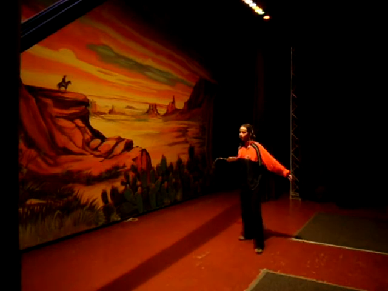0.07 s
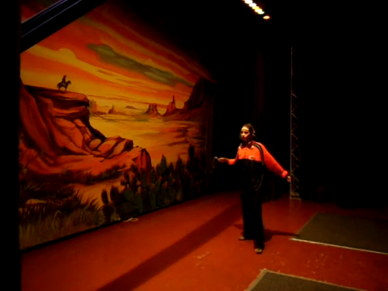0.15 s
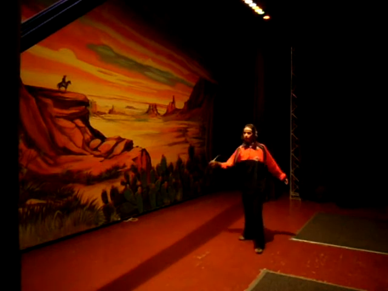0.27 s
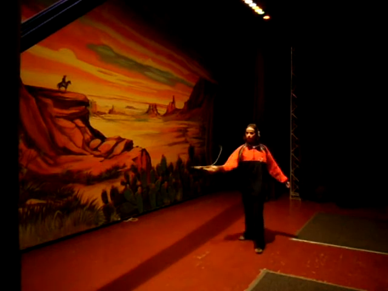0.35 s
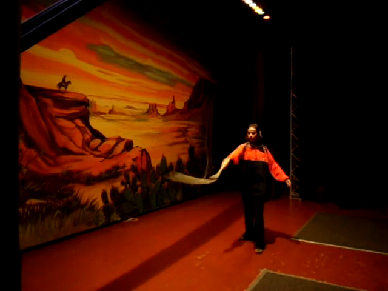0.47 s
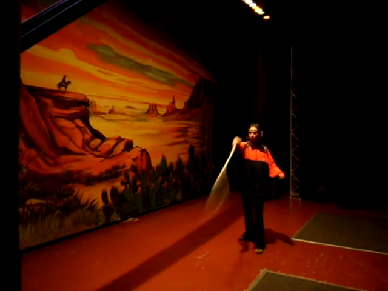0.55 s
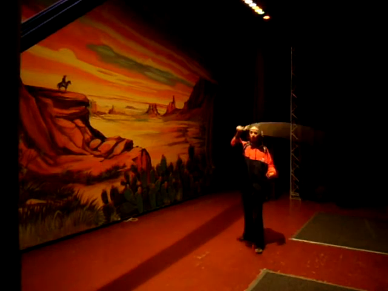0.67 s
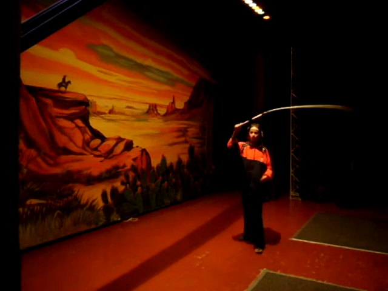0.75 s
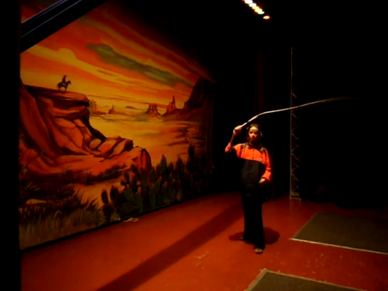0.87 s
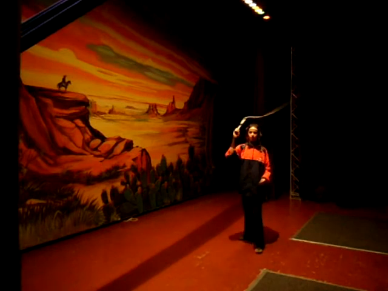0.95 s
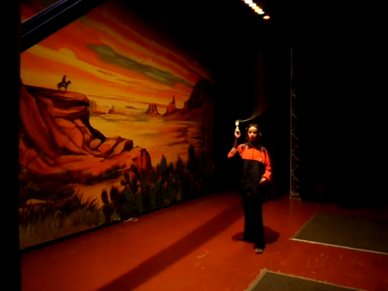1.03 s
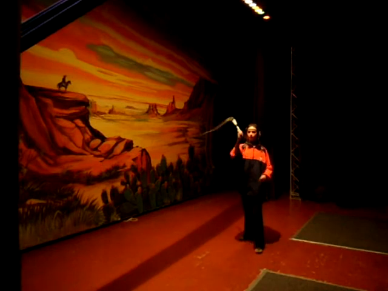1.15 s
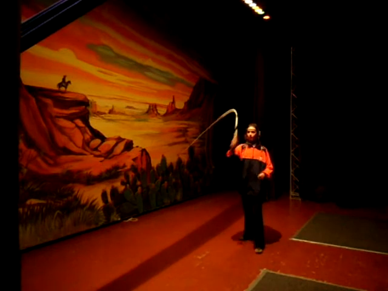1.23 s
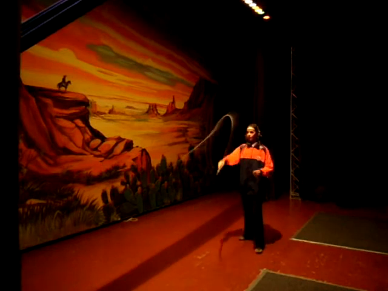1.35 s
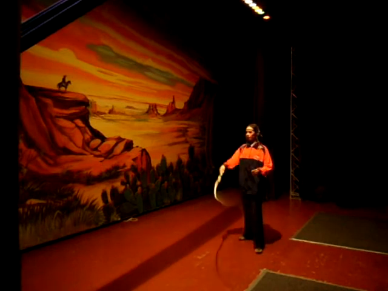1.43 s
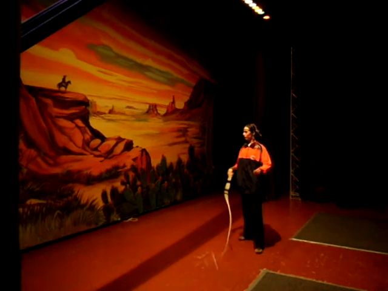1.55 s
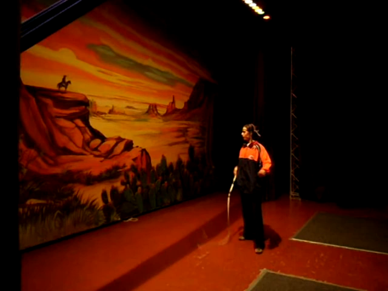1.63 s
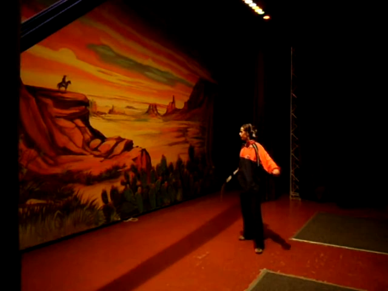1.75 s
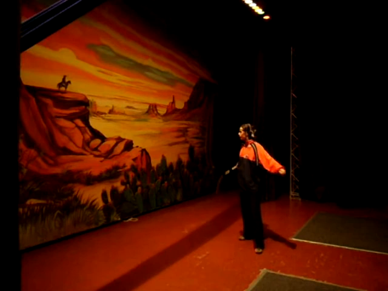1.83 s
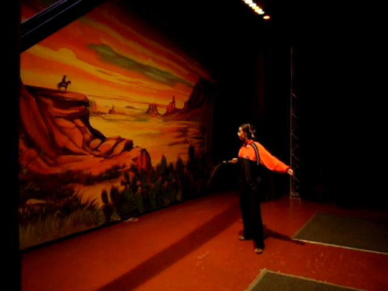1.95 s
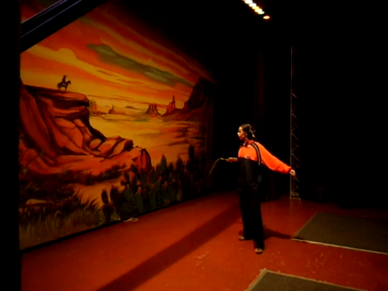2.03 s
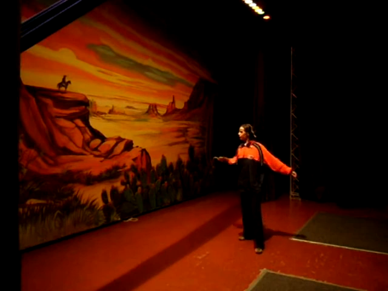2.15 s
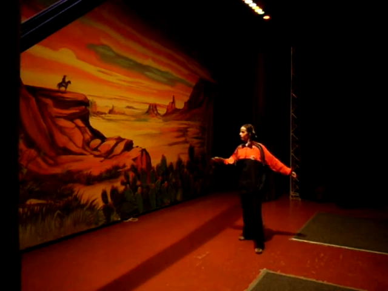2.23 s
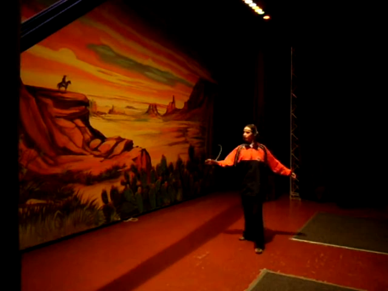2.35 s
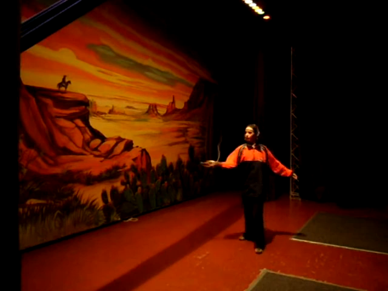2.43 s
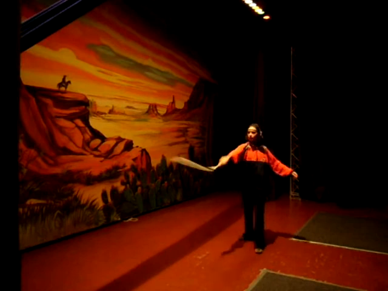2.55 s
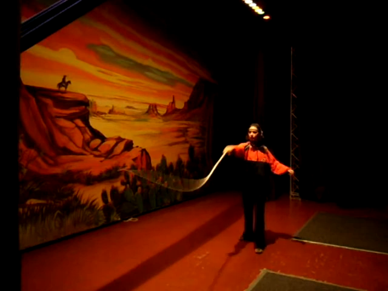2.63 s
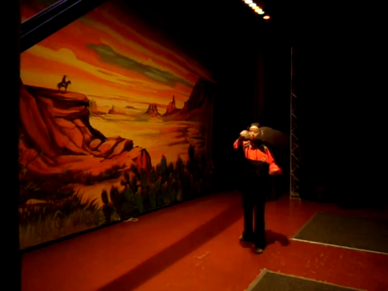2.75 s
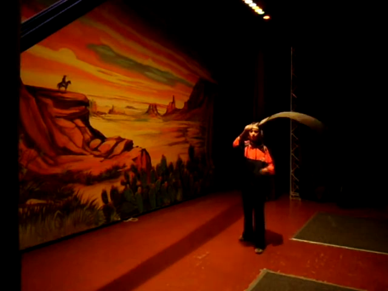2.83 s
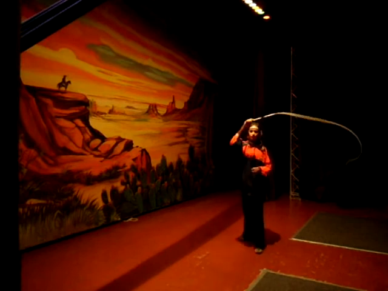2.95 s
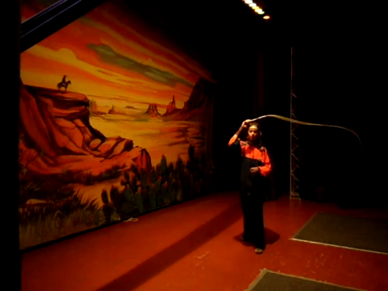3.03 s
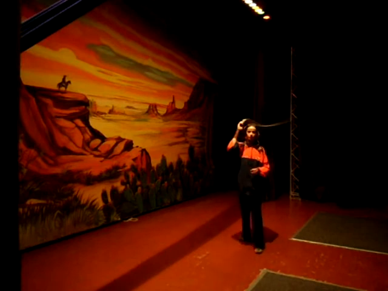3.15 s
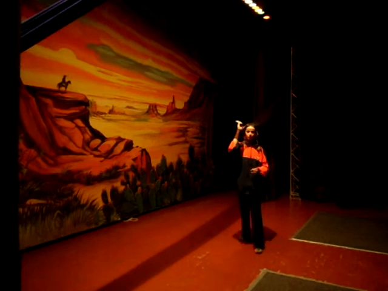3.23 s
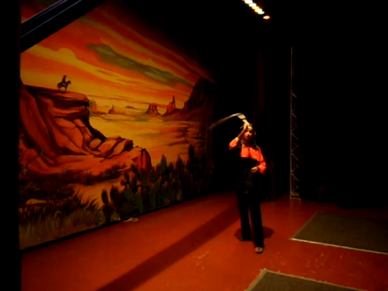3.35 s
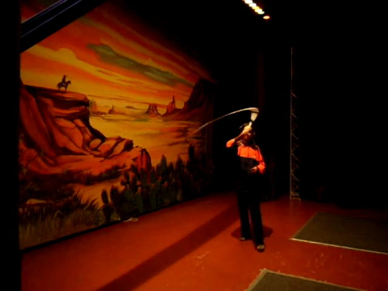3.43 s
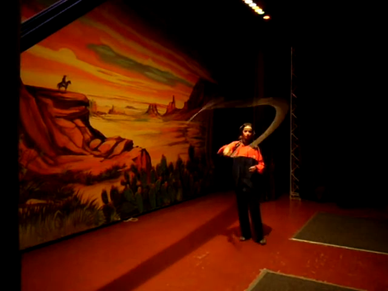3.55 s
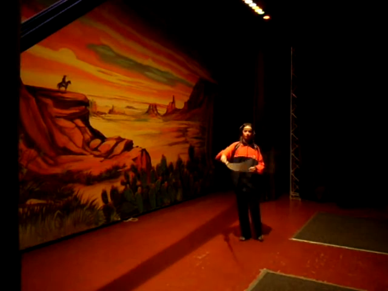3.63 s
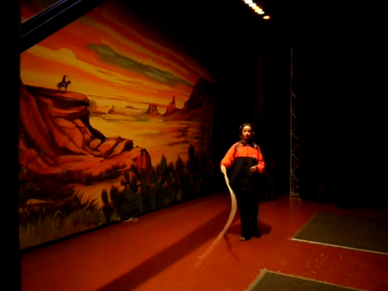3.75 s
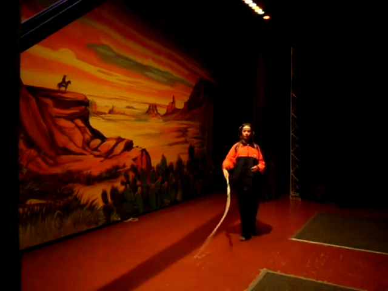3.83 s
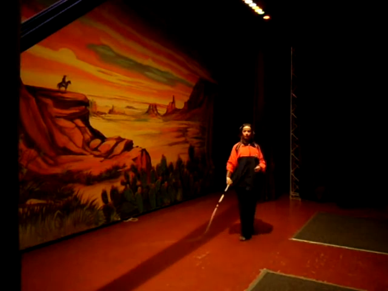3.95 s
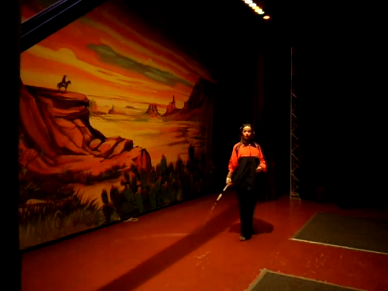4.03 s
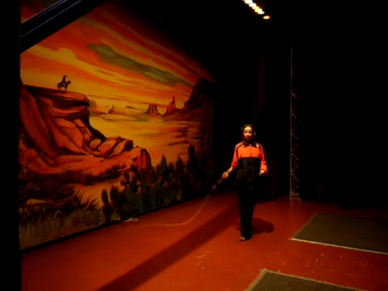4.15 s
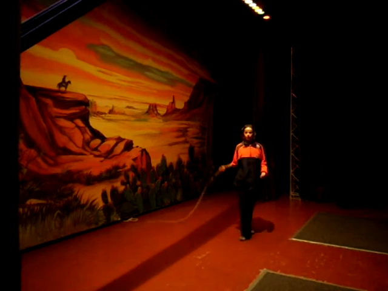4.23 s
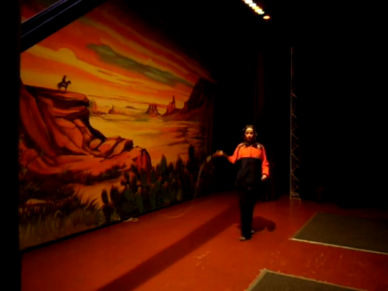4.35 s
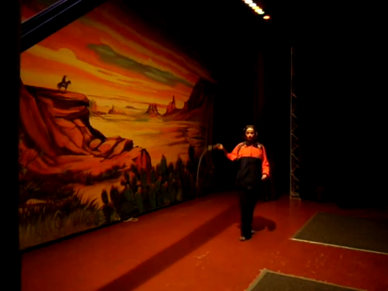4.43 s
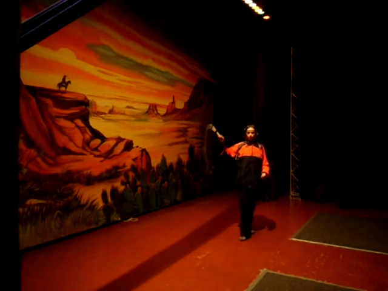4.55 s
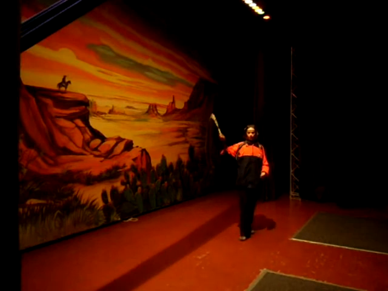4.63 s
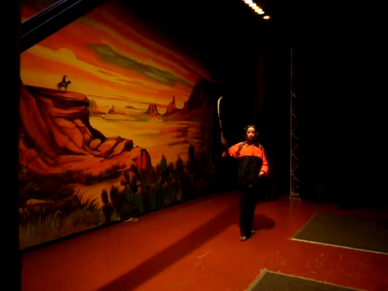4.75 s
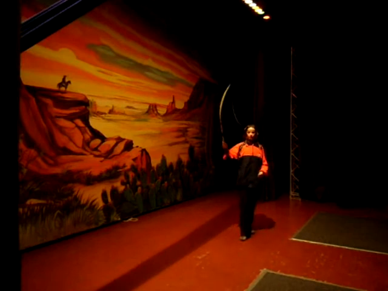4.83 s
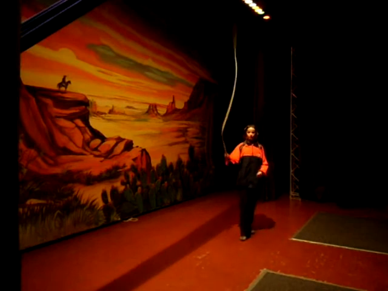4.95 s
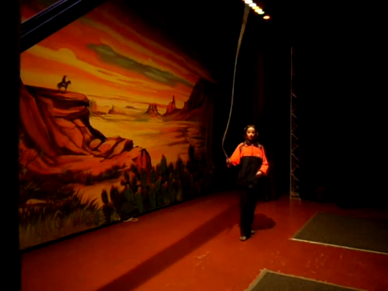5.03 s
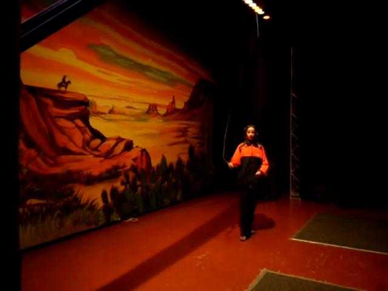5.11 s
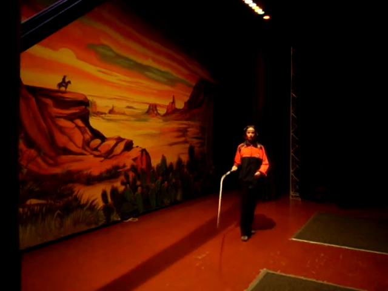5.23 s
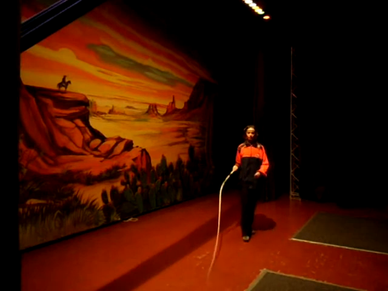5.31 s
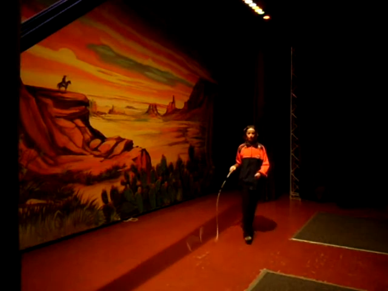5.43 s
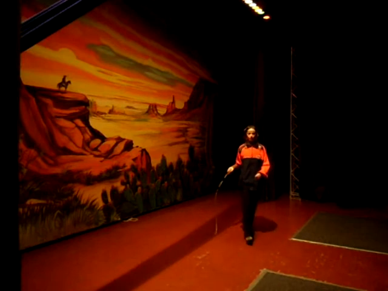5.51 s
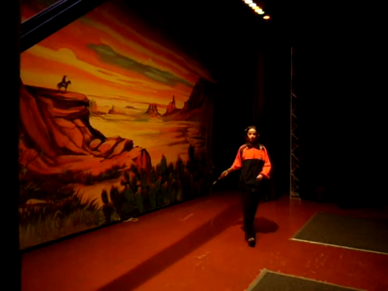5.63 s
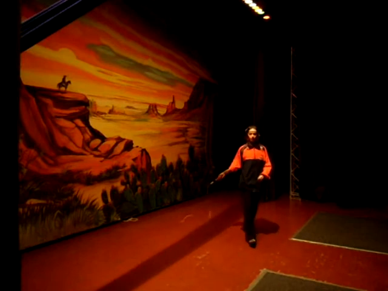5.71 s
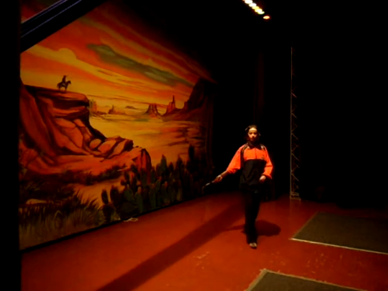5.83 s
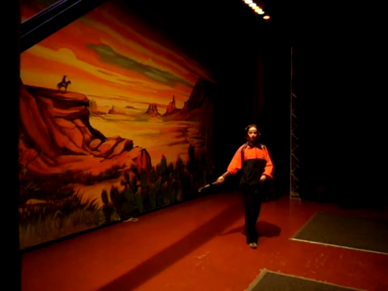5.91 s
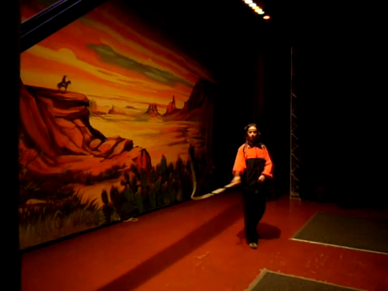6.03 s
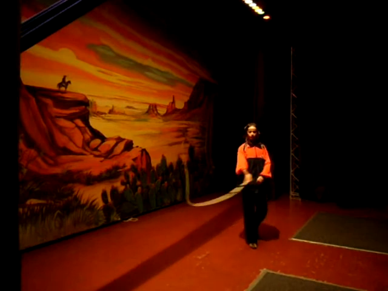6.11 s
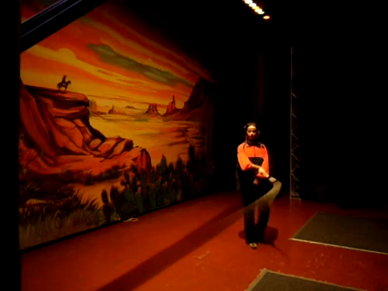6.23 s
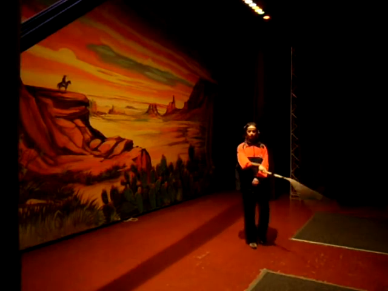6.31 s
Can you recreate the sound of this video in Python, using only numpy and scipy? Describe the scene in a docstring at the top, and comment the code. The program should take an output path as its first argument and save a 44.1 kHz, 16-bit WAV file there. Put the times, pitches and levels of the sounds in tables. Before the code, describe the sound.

Someone swings a whip in a large bare room, heard from a few metres through a small, band-limited microphone. Faint airy swishes lead into sharp, gunshot-like cracks with quick wall echoes and a short hall tail. The first three are violent and clipped, the fourth weaker, and the last two merge into one small snap. Low hiss and faint rumble continue below; soft swishes end it.

```python
"""A soft swish comes first, over a quiet hiss; then a whip cracks six times, the last two almost as one.
The whip is swung on a bare indoor stage, some metres from a small camera. Swishes are shaped noise
with fuzzy whistles; each crack is a rush of noise, a pop, a flutter, echoes and a ring of the hall.
Weaker flicks are small cracks that favour one band. Hiss and low tones lie underneath.
The loudest cracks overload the camera's narrow-band input."""
import sys
import numpy as np
from scipy import signal
from scipy.fft import rfft, irfft
from scipy.io import wavfile
from scipy.ndimage import uniform_filter1d

SR = 44100
rng = np.random.default_rng(int(sys.argv[2]) if len(sys.argv) > 2 else 0)


def generate_wav(sig):
    """Save sig (samples, or channels by samples) to the path in sys.argv[1] as 16-bit PCM at SR."""
    pcm = np.round(np.clip(np.atleast_2d(sig).T, -1, 1) * 32767).astype(np.int16)
    wavfile.write(sys.argv[1], SR, pcm)


N = 280913  # length of the scene [samples]

# Full cracks of the tip: (time [s], pop level [dB], pop pitch [Hz], pop length [cycles],
# flutter level [dB], wall echo level [dB], hall level [dB], tilt [dB per octave],
# rush level [dB], rush build-up [ms, at least 1 is used], floor echo level [dB])
FULL_CRACKS = [ (0.5169, 9, 730, 0.75, -8.5, -2, -5, -0.5, -8, 0.97, -5),
               (1.3775, 7, 1280, 0.5, 1, -7.5, 11, 4.5, -23.5, 8.5, -18),
               (2.6258, 12, 980, 0.72, 9, -4.5, 4.5, 3, -11, 3.7, -27),
               (3.5933, -7.5, 947, 0.69, -23, -9, -8, 0.25, -27, 5.6, -10),
               (5.2865, -22, 992, 0.78, -11.5, -8, -21.5, 0.5, -27, 1.1, -4),
               (5.2909, -15, 845, 2.2, -34.5, 6, -24, -5, -55, 3.1, -7), ]
# Basic colour of a crack at the microphone: (frequency [Hz], level [dB])
CRACK_COLOUR = [(60, -47), (150, -24.5), (260, -16.5), (400, -10.5), (600, -6), (950, -1), (1700, -3.5),
                (2600, -0.5), (4000, -6), (4900, -9), (5400, -17)]
# Echoes from backdrop and walls: (delay [ms], level before the crack's own echo level [dB])
WALL_ECHOES = [(9, -3.5), (11.5, -0.5), (16, -6.5), (23, -3), (29, -7), (34, -5.5)]
# How long the hall rings: (frequency [Hz], time to fall by 60 dB [s])
HALL_DECAY = [(100, 0.72), (260, 0.95), (700, 0.82), (1800, 0.68), (3500, 0.67), (5300, 0.6)]


def crack(time_s, pop_db, pop_hz, pop_cycles, flutter_db, echo_db, hall_db, tilt_db,
          rush_db, rush_ms, floor_db, lift_db=0):
    """The tip rushes, pops and flutters; echoes off floor and walls follow, then the hall rings."""
    ms = np.arange(SR) * 1000 / SR
    short_ms = ms[:1000]
    lead = 2205  # samples of rush before the pop: 50 ms

    # the colour: basic curve, a tilt around 1500 Hz and a lift around the pop's pitch
    hz = np.fft.rfftfreq(4096, 1 / SR)
    tilt = tilt_db * octaves_from_1500(hz)
    lift_octaves = 0.36  # half-width of the lift, to 1/e of its dB
    lift = lift_db * np.exp(-(np.log2((hz + 1) / pop_hz) / lift_octaves) ** 2)
    colour = causal(read(CRACK_COLOUR, hz) + tilt + lift)
    colour = colour / np.linalg.norm(colour)

    # the pop: air is pulled, pushed and pulled
    cycles = short_ms * pop_hz / 1000
    age = cycles / pop_cycles
    pop_swell = age ** .5 * np.exp(1 - age ** 2)
    pop = -gain_of(pop_db) * np.sin(2 * np.pi * cycles) * pop_swell

    # the frayed tip shakes: noise that starts quickly and dies away [ms]
    flutter_swell = np.exp(-short_ms / 3.8) * (1 - np.exp(-short_ms / 0.59))
    flutter = gain_of(flutter_db) * rng.standard_normal(1000) * flutter_swell
    near = signal.fftconvolve(flutter, colour)
    # the microphone drops deep bass
    near[:1000] += signal.lfilter(*signal.butter(1, 120, "high", fs=SR), pop)

    walls = np.zeros(2000)
    for delay_ms, db in WALL_ECHOES:
        jittered_ms = delay_ms + rng.uniform(-.3, .3)
        walls[round(jittered_ms * SR / 1000)] = gain_of(db + echo_db)
    # cloth and flats return little bass
    thin = signal.lfilter(*signal.butter(2, 1700, "high", fs=SR), near)
    echoes = signal.fftconvolve(thin, walls)
    floor_delay_ms = 3.5  # the bounce off the stage
    add(echoes, round(floor_delay_ms * SR / 1000), gain_of(floor_db) * near)

    def hall_field(f, t):
        """Level of the dying hall, with an extra boost at the start [dB]."""
        return -60 * t / read(HALL_DECAY, f) + 9.75 * np.exp(-t / 0.049)

    ring = noise(hall_field, SR, patchy_db=1.5)
    ring = ring / np.sqrt(np.mean(ring[:lead] ** 2))
    ring = ring * (1 - np.exp(-ms / 13.4))  # reflections thicken

    rush_swell = np.exp(-ms[lead:0:-1] / max(rush_ms, 1))
    rush = gain_of(rush_db) * rng.standard_normal(lead) * rush_swell

    out = signal.fftconvolve(np.concatenate([rush, gain_of(hall_db) * ring]), colour)
    add(out, lead, near)
    add(out, lead, echoes)
    return round(time_s * SR) - lead, out


# Light flicks and slaps of the tip, each with its own colour: (time [s], pop level [dB],
# flutter level [dB], hall level [dB], tilt [dB per octave], favoured pitch [Hz],
# its lift [dB], rush level [dB])
LIGHT_FLICKS = [ (0.498, -44, -25, -41, -0.5, 3270, -7, -21), (0.51, -31, -9, -31, -5.5, 3580, 25, -12.5),
                (0.519, -16.5, -40, -23, -5, 381.7, 9.5, -70.5), (1.356, -45, -34, -50.5, 2, 3606, 12, -45),
                (3.946, -32, -55, -40, -4, 680, 7.5, -45), (5.288, -30.5, -50, -36, -7, 155, 13, -71),
                (5.74, -48, -40, -42.5, 3.5, 2480, 1.5, -63.5),
                (5.855, -45, -37, -52, 5.5, 3600, 11.5, -69.5),
                (6.22, -38, -17.5, -27.5, 20.5, 2540, 19, -42), ]


def flick(time_s, pop_db, flutter_db, hall_db, tilt_db, peak_hz, lift_db, rush_db):
    """A weak crack made the same way, with a band around its pop's pitch raised or lowered."""
    return crack(time_s, pop_db, peak_hz, pop_cycles=1.8, flutter_db=flutter_db, echo_db=-9,
                 hall_db=hall_db, tilt_db=tilt_db, rush_db=rush_db, rush_ms=4.7,
                 floor_db=-8, lift_db=lift_db)


# Swishes of the whip: (fastest moment [s], level [dB], rise [s], fall [s],
# tilt [dB per octave], thong whistle pitch at the fastest moment [Hz],
# thong's share of power [0-1], thinner fall's share of power [0-1])
WHIP_SWISHES = [ (0.005, -51, 0.009, .13, -0.5, 1100, 0.16, 0), (0.27, -51.5, .04, .15, 3, 1030, 0, 0),
                (0.389, -48, 0.067, .15, -5.5, 1060, 0.07, .05), (0.485, -43.5, 0.14, .02, 6, 1010, .05, 0),
                (1.146, -46.5, 0.036, 0.099, -7, 1430, 1, 0.6),
                (1.25, -50.5, 0.089, 0.23, -6.5, 1070, 0.34, 0.04),
                (1.361, -43.5, 0.027, 0.034, -3, 1100, 0.15, 0),
                (2.15, -53.5, 0.14, 0.0876, -4.5, 845, 0.12, 0),
                (2.31, -50.5, 0.1094, .1, -5, 817, .2, 0.01), (2.587, -33.5, .045, .1, 0, 1300, 0, 0.01),
                (2.616, -35.5, 0.055, 0.026, -6.5, 813, 0.08, 0.3),
                (3.25, -49.5, 0.11, 0.127, -4, 809, 0, 0), (3.40, -51, 0.075, .08, 2, 1000, 0.36, .05),
                (3.5, -44.5, 0.11, 0.11, -4, 1370, 0.47, 0.23),
                (3.581, -41, 0.033, .02, -3.5, 892.5, .2, 0.04),
                (3.98, -44, 0.29, 0.32, -3.5, 1080, 0.6, 0.18),
                (4.33, -51, 0.066, 0.27, -4.5, 753, 0.35, 0),
                (4.564, -50.5, 0.0596, 0.1, -6.5, 654, .05, 0.03),
                (4.72, -52.5, 0.068, 0.199, -3.5, 598, 0.27, 0.07),
                (4.91, -47, .11, 0.2, -4.5, 1200, 0.25, 0.1),
                (5.47, -49.5, .06, 0.16, 2.5, 882.4, 0.18, 0.03),
                (5.68, -47, 0.22, 0.23, -3.5, 834, 0.45, 0), (5.80, -50.5, .1, 0.18, -2, 995, .1, 0.01),
                (6.2, -41.5, 0.035, 0.07, -5, 1195, 0.13, 0),
                (6.25, -44.5, 0.08, 0.3, -7, 1180, 0.02, 0.47), ]


def swing(time_s, level_db, rise_s, fall_s, tilt_db, thong_hz, thong_share, fall_share):
    """Air tears off the whip: wide hiss, and two fuzzy whistles from its thick and thin parts."""
    t = np.arange(-min(.3, time_s), .45, 1 / SR)  # 0 is the fastest moment
    drop_db, roundness = 21, 1.5  # drop over rise or fall; 1 is a pointed swell, 2 a round one
    distance = np.where(t < 0, -t / rise_s, t / fall_s)
    swell = gain_of(-drop_db * distance ** roundness)
    low_hz = thong_hz * np.maximum(swell, .03) ** .12  # pitch sags with level
    high_hz = 1.98 * low_hz  # the thinner fall whistles higher

    def hiss_field(f, u):
        """Steady colour of the hiss [dB]."""
        return .5 * read(CRACK_COLOUR, f) + tilt_db * octaves_from_1500(f)

    hiss = evened(noise(hiss_field, len(t), patchy_db=3.5))
    # both whistles come from the same eddies, passed twice through a moving resonance
    eddies = rng.standard_normal(len(t))
    thong = evened(resonate(resonate(eddies, low_hz, 330), low_hz, 330))
    fall = evened(resonate(resonate(eddies, high_hz, 650), high_hz, 650))

    low, high = np.clip(thong_share, 0, 1), np.clip(fall_share, 0, 1)
    body = np.sqrt(1 - low) * hiss + np.sqrt(low) * thong
    mix = np.sqrt(1 - high) * body + np.sqrt(high) * fall
    soft_ends = signal.windows.tukey(len(t), 300 / len(t))
    return round((time_s + t[0]) * SR), gain_of(level_db) * swell * mix * soft_ends


# Colour of the steady floor, before its overall level is set: (frequency [Hz], level [dB])
HUSH_COLOUR = [(10, -17.5), (20, -9), (30, -14), (45, -8), (56, -21.5), (80, -19), (150, -19), (300, -20),
               (900, -19), (1800, -23.5), (2600, -21), (4600, -26), (5400, -32.5)]
# Low tones that beat against each other, before they waver: (frequency [Hz], level [dB])
LOW_TONES = [(26, -62.5), (40.5, -60), (46.8, -62.5)]


def hush():
    """Hiss of the input and rumble of the building: shaped noise and a few wavering low tones."""
    hz = np.fft.rfftfreq(N, 1 / SR)
    shaped = irfft(rfft(rng.standard_normal(N)) * gain_of(read(HUSH_COLOUR, hz)), N)
    out = gain_of(-54) * evened(shaped)
    for tone_hz, db in LOW_TONES:
        drift = evened(uniform_filter1d(uniform_filter1d(rng.standard_normal(N), 9000), 9000))
        phase = 2 * np.pi * np.cumsum(tone_hz + 0.34 * drift) / SR
        # the level follows the same drift backwards
        out += gain_of(db + 1.3 * drift[::-1]) * np.sin(phase)
    return out


def gain_of(db):
    """Turns decibels into gain."""
    return 10 ** (np.asarray(db) / 20)


def evened(x):
    """Scales a sound to an rms of one."""
    return x / np.sqrt(np.mean(x ** 2) + 1e-20)


def octaves_from_1500(hz):
    """Counts octaves from 1500 Hz, held steady below 200 and above 6000 Hz."""
    return np.log2(np.clip(hz, 200, 6000) / 1500)


def read(points, hz):
    """Reads a table between its points, on a log-frequency axis."""
    f, value = np.transpose(points)
    return np.interp(np.log(hz + 1), np.log(f + 1), value)


def add(mix, at, sound):
    """Mixes a sound in from sample number at."""
    part = mix[at:][:len(sound)]
    part += sound[:len(part)]


def noise(field_db, size, patchy_db):
    """Makes patchy noise whose short-time spectra follow field_db(hz, t), size samples long."""
    hz = np.fft.rfftfreq(512, 1 / SR)[:, None]
    t = np.arange(size // 128 + 5) * 128 / SR
    real, imaginary, c = rng.standard_normal((len(t), len(hz), 3)).T
    # smooth over frequency, then over time
    patches = evened(uniform_filter1d(uniform_filter1d(c, size=5, axis=0), size=12, axis=1))
    spectra = (real + 1j * imaginary) * gain_of(field_db(hz, t) + patchy_db * patches)
    return signal.istft(spectra, nperseg=512, noverlap=384)[1][:size]


def causal(colour_db):
    """Makes a filter of this colour that rings only after its input (minimum phase)."""
    both_sides_db = np.concatenate([colour_db, colour_db[-2:0:-1]])
    log_gain = np.log(gain_of(both_sides_db))
    return np.fft.ifft(np.exp(np.conj(signal.hilbert(log_gain)))).real[:2048]


def resonate(x, hz, width):
    """Resonates at a moving pitch: shifts it down to zero, smooths, and shifts back."""
    turn = np.exp(2j * np.pi * np.cumsum(hz) / SR)
    r = np.exp(-np.pi * width / SR)
    return 2 * (turn * signal.lfilter([1 - r], [1, -r], x / turn)).real


def scene():
    """Lays cracks, flicks and swishes over the steady floor."""
    mix = hush()
    for play, rows in ((crack, FULL_CRACKS), (flick, LIGHT_FLICKS), (swing, WHIP_SWISHES)):
        for row in rows:
            add(mix, *play(*row))
    return mix[None]


def low_pass(x, taps, edge_hz):
    """Removes the treble above edge_hz without delaying the sound."""
    fir = signal.firwin(taps, edge_hz, window=("kaiser", 9), fs=SR)
    return signal.oaconvolve(x, fir[None], "same")


def record(dry):
    """The input saturates and is band-limited; a later gain stage clips the peaks again."""
    ceiling = 1.294
    held = np.clip(dry, -ceiling, ceiling)
    narrow = low_pass(held, 701, 5400)
    clipped = np.clip(narrow + 0.015, -1, 1)  # with the standing offset of the converter
    return low_pass(clipped, 401, 15800)


dry = scene()
out = record(dry)
generate_wav(out)
```